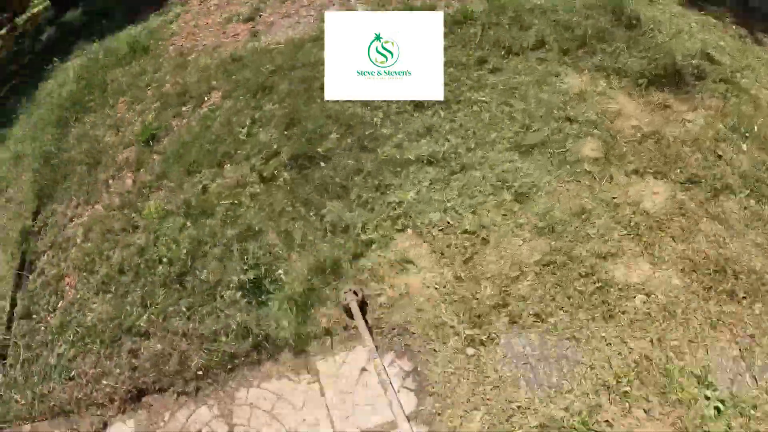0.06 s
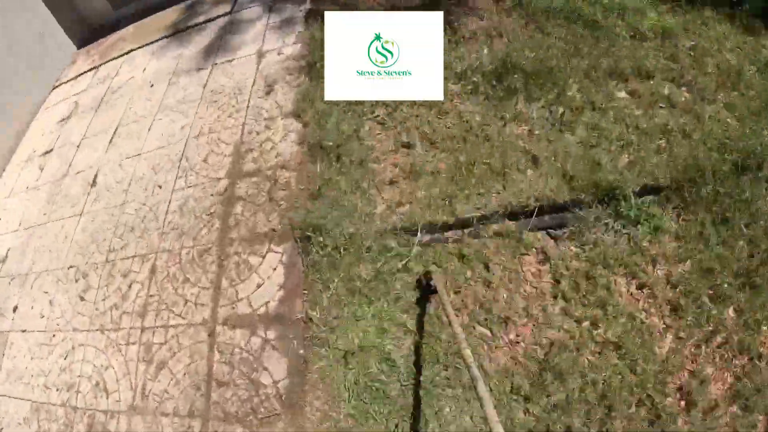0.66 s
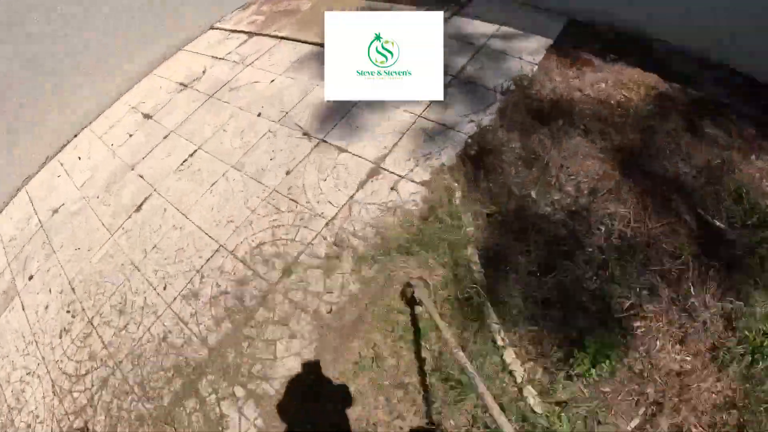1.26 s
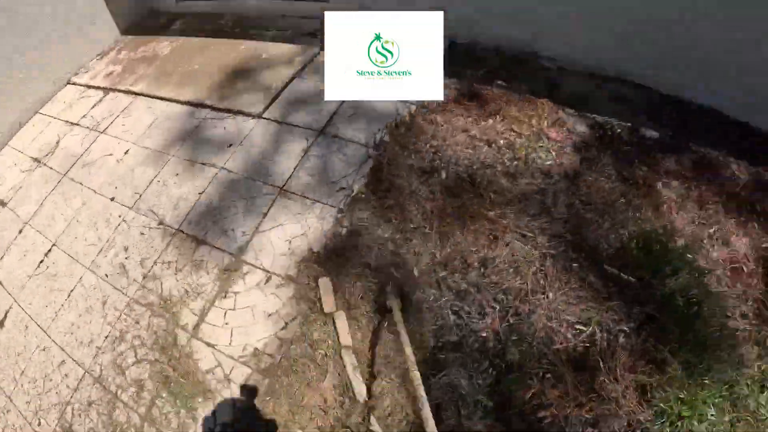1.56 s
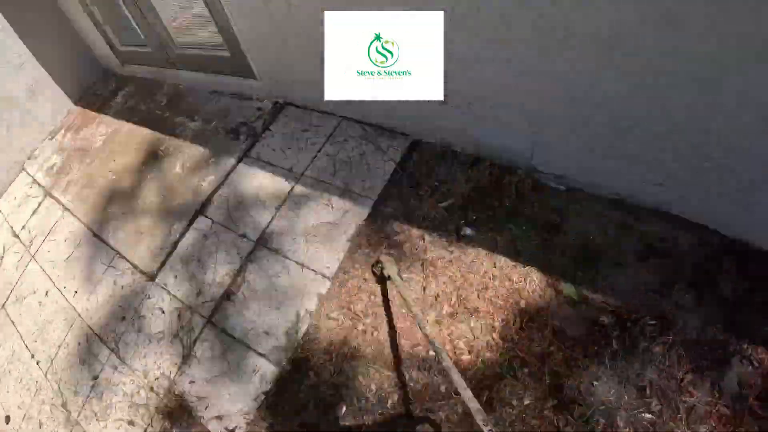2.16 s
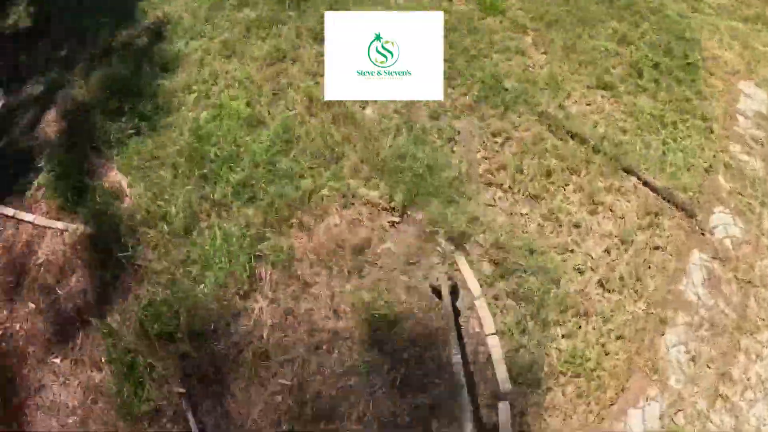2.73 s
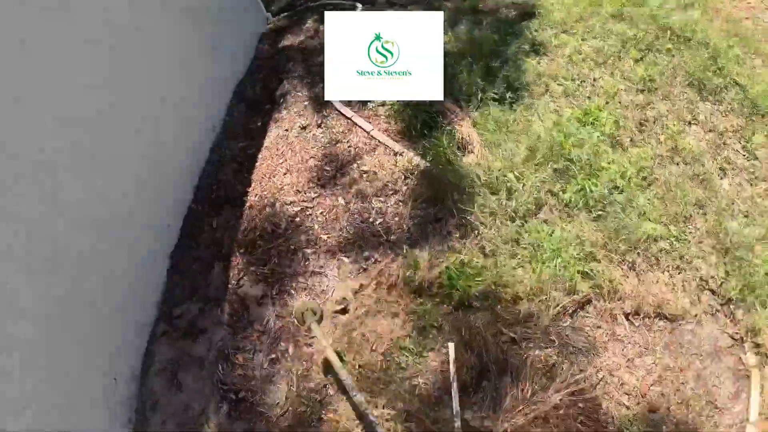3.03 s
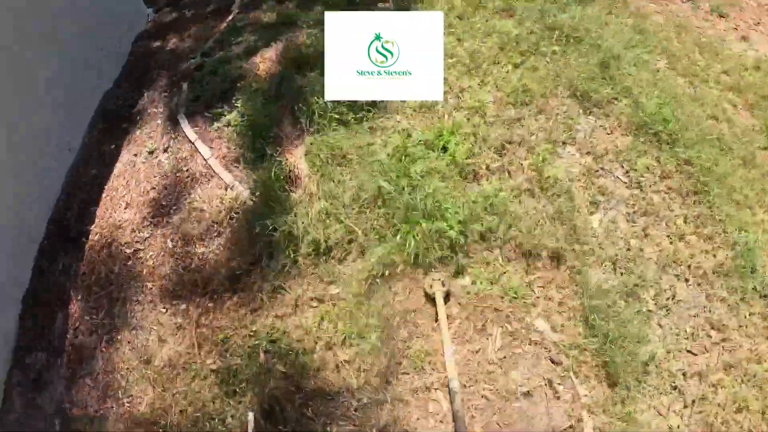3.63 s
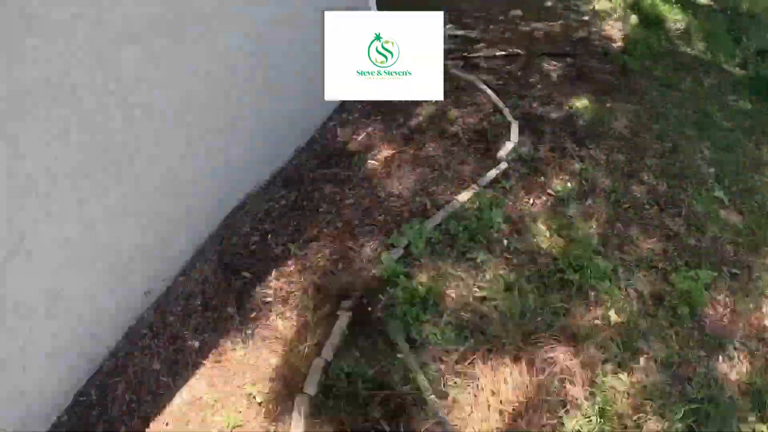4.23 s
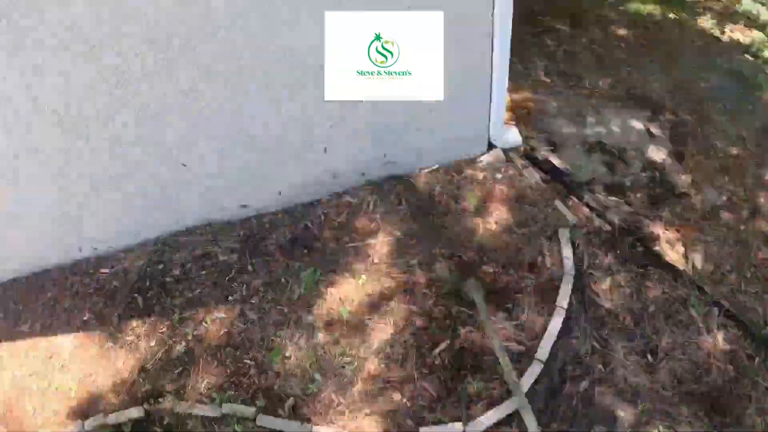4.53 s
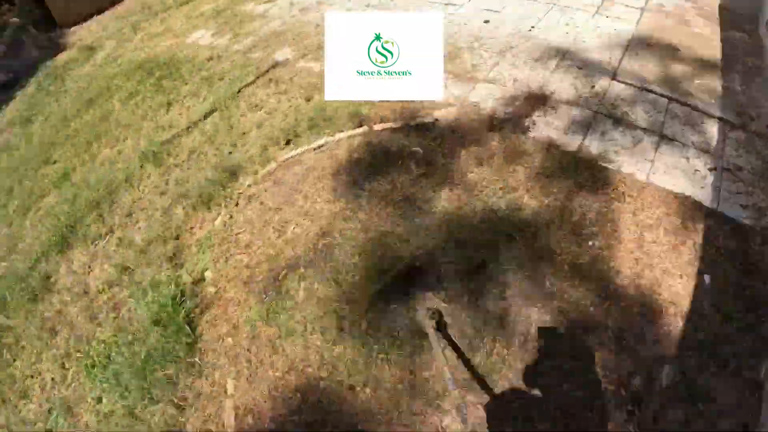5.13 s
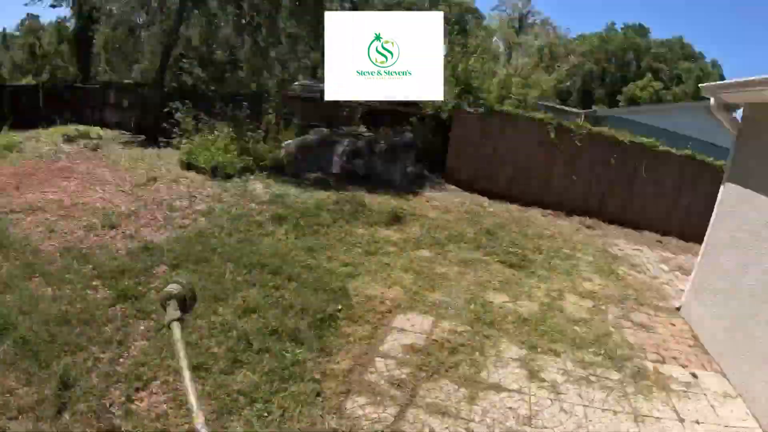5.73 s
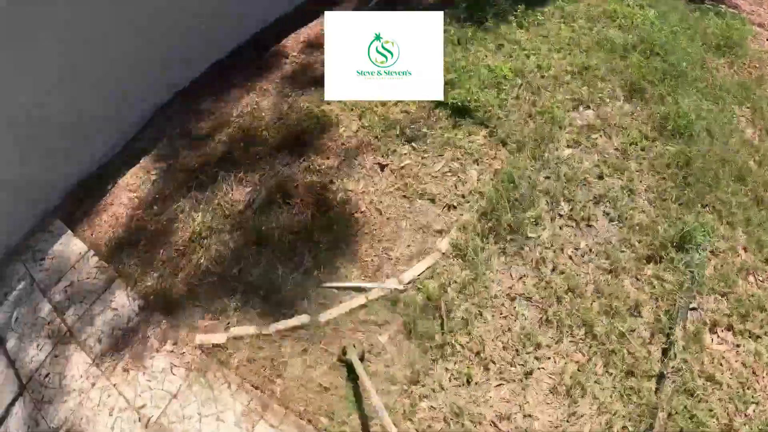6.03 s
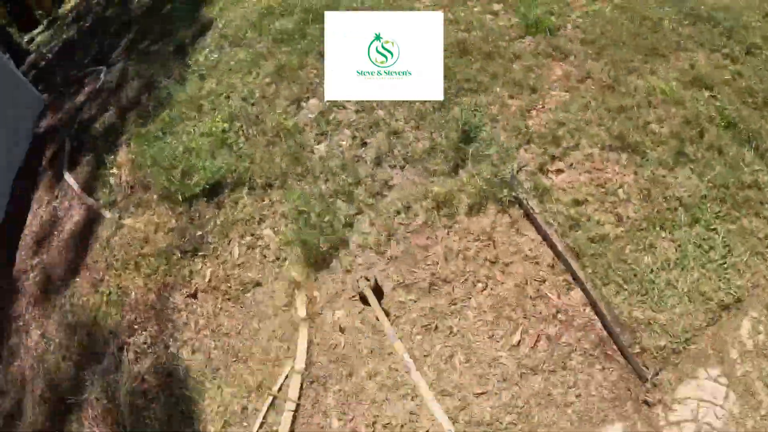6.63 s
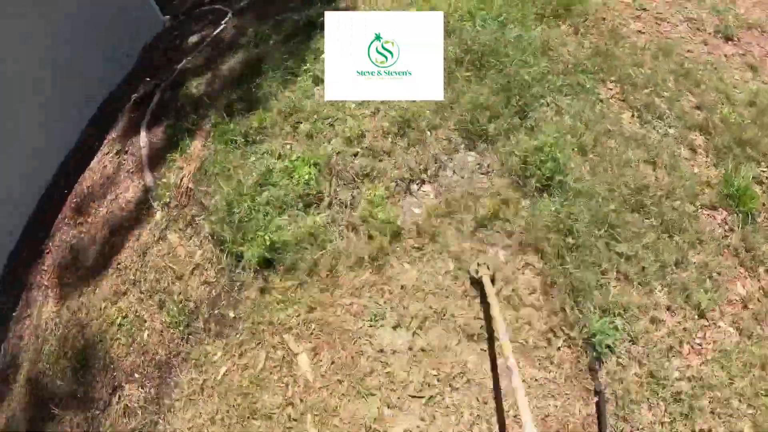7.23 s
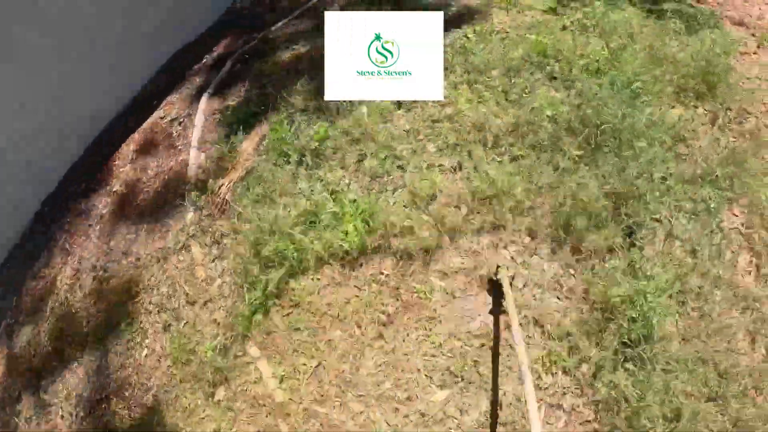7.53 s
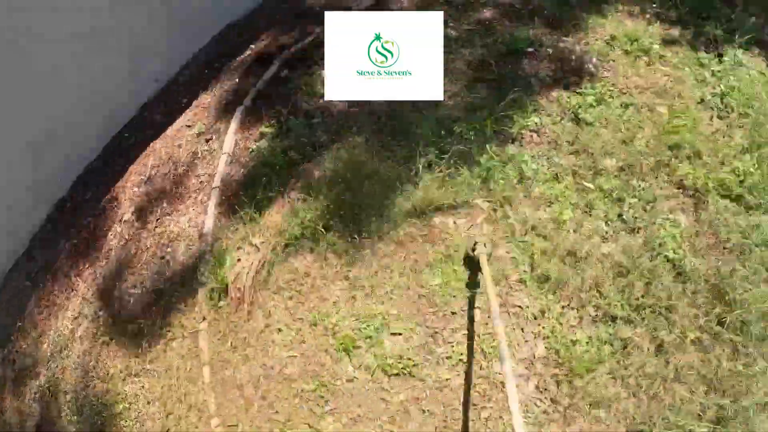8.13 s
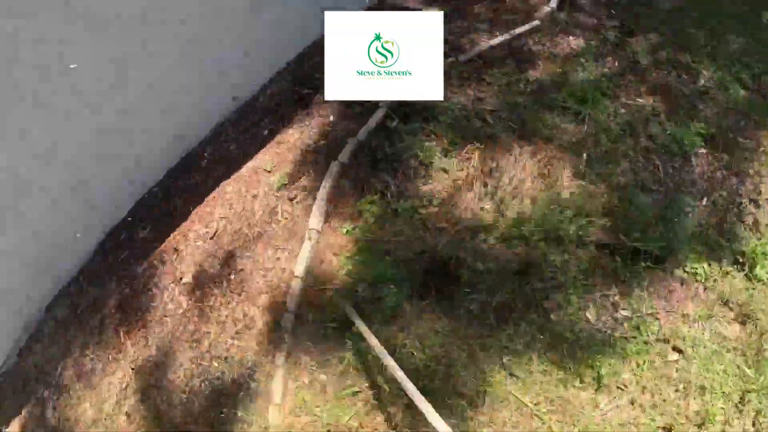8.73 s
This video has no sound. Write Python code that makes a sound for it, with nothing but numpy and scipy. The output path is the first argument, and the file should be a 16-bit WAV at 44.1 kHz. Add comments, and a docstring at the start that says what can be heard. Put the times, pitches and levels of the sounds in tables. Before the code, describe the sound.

A petrol string trimmer is already cutting grass at the start, heard close from the operator's chest in an open yard. Its fast buzz wavers constantly: several times a second the line bites into the grass with a burst of thrashing, the pitch sags, then it spins up again. Deep dips come right at the start, near 0.9 seconds and around 4.1 seconds. A rough whine and a bright hiss of flying clippings run alongside. At about 5.4 seconds the throttle is released and the head coasts with a lower, duller buzz. Near 5.9 seconds it revs sharply back up and keeps cutting until the end, just before 9 seconds. Wind hits the microphone in rumbling gusts and dull pops, notably around 1 second, from 3 to 5.5 seconds and from 7 to 8. A faint, distant engine drone slowly sinks in pitch and fades after 7 seconds.

```python
"""A buzz dips and rises as a string trimmer cuts a lawn, heard from the operator's chest.
The throttle sets the speed of the whirling line; each bite into the grass drags the buzz down with
a burst of thrashing, then it spins up again. The drive whines beside it and clippings hiss.
Near 5.5 s the throttle is let go once and the cutting head coasts.
A far drone sinks slowly in pitch, and air hits the microphone in rumbling gusts and dull pops."""
import sys
import numpy as np
from scipy import signal
from scipy.fft import rfft, irfft, next_fast_len
from scipy.io import wavfile
from scipy.ndimage import uniform_filter1d

SR = 44100
rng = np.random.default_rng(int(sys.argv[2]) if len(sys.argv) > 2 else 0)


def output_pcm(signal):
    """Save a mono or channel-first signal as 16-bit PCM at the path in sys.argv[1].

    Samples are clipped to [-1, 1] before scaling.
    """
    pcm = np.clip(np.atleast_2d(signal).T, -1, 1) * 32767
    wavfile.write(sys.argv[1], SR, np.round(pcm).astype(np.int16))


N = 387638
WORKING_HZ = 451  # passes of the line per second at normal cutting speed

# how alike a noise is on the left and right: f/Hz, likeness (1 = the same)
STEREO_LIKENESS = [(100, 0.79), (300, 1), (800, 1), (2500, 1), (4500, 0.99), (9000, 0.92), (14000, 0.9)]


def from_db(db):
    """Turn decibels into a gain."""
    return 10 ** (np.asarray(db) / 20)


def to_db(gain):
    """Turn a gain into decibels."""
    return 20 * np.log10(gain)


def rms_one(x):
    """Scale a signal so its average power is 1."""
    return x / np.sqrt(np.mean(x ** 2) + 1e-20)


def in_time(rows):
    """Join a table's timed points with straight lines, one curve per value column."""
    times, *columns = np.transpose(rows)
    return [np.interp(np.arange(N) / SR, times, column) for column in columns]


def at_hz(points, hz):
    """Look up a table by frequency, with octaves evenly spaced."""
    table_hz, values = np.transpose(points)
    return np.interp(np.log(hz), np.log(table_hz), values)


def drift(rate):
    """A smooth random wobble of typical size 1 that changes about rate times a second."""
    pole = np.exp(-40 * np.pi * rate / SR)
    slow = signal.lfilter([1], [1, -2 * pole, pole * pole], rng.standard_normal(N // 20 + 4002))[4000:]
    return np.interp(np.arange(N) / 20, np.arange(len(slow)), rms_one(slow))


def swell(peak_s, rise_s, fall_s, hold_s=0):
    """A rounded hump that reaches 1 at peak_s, holds and falls away."""
    t = np.arange(0, N, 20) / SR - peak_s
    shape = np.exp(-(np.minimum(t, 0) / rise_s) ** 2 - (np.maximum(t - hold_s, 0) / fall_s) ** 2)
    return np.interp(np.arange(N) / 20, np.arange(len(shape)), shape)


def turn(hz):
    """The phase: the angle turned so far at a changing frequency."""
    return 2 * np.pi * np.cumsum(hz) / SR


def sine(phase, level_db):
    """A pure tone whose average power is level_db."""
    return np.sqrt(2) * from_db(level_db) * np.cos(phase)


def white():
    """Two unrelated white noises."""
    return rng.standard_normal((2, N))


def coloured(noises, colour, likeness=STEREO_LIKENESS):
    """Give two noises one tone colour and blend them into left and right, at power 1."""
    size = next_fast_len(N + SR // 10)
    hz = np.maximum(np.fft.rfftfreq(size, 1 / SR), 1)
    mid, side = rfft(noises, size) * from_db(at_hz(colour, hz)) * hz / (hz + 10)
    alike = np.clip(at_hz(likeness, hz), 0, 1)
    left_right = np.sqrt(1 + alike) * mid + np.sqrt(1 - alike) * side * [[1], [-1]]
    return rms_one(irfft(left_right, size)[:, :N])


def throttle_shut(throttle, shut_hz=275, open_hz=376, catch_s=.07):
    """1 while the head coasts, 0 under power; the engine catches just after the throttle opens."""
    t = np.arange(N) / SR
    shut = np.clip((open_hz - throttle) / (open_hz - shut_hz), 0, 1)
    return np.maximum(shut, np.interp(t - catch_s, t, shut))


def grass_bites(brush_db=-47, recover_s=.016):
    """Each bite slows the head and tears grass; gives the speed lost (Hz) and the tearing level (dB)."""
    # bites into the grass: t/s when slowest, slowing time/s, speed lost/Hz, relative level/dB
    bites = [(0.025, 0.084, 206, -33), (0.186, 0.052, 55, -47), (0.284, 0.044, 38, -40),
             (0.628, 0.091, 53, -56), (0.721, 0.027, 68, -39), (0.837, 0.13, 80, -59),
             (0.896, 0.023, 8.8, -44), (0.941, 0.055, 175, -33), (1.151, 0.022, 39, -39),
             (1.264, 0.04, 84, -34), (1.449, 0.024, 41, -34), (1.571, 0.019, 15, -37),
             (1.803, 0.073, 31.5, -39), (1.927, 0.02, 81, -33), (2.105, 0.092, 74, -42),
             (2.306, 0.097, 86, -42), (2.416, 0.047, 28, -53), (2.672, 0.013, 32, -47),
             (2.729, 0.012, 25.6, -41), (2.78, 0.017, 24.2, -46), (2.85, 0.018, 25, -42),
             (2.93, 0.022, 20.6, -36.5), (3.064, 0.013, 37.4, -31), (3.193, 0.1, 85, -41),
             (3.225, 0.015, 15, -32), (3.413, 0.069, 86, -40), (3.545, 0.033, 43, -39),
             (3.766, 0.15, 86, -41), (3.963, 0.028, 63, -45), (4.022, 0.068, 29, -59),
             (4.127, 0.038, 141, -37), (4.257, 0.015, 31.6, -41), (4.353, 0.013, 45, -50),
             (4.459, 0.031, 114, -35), (4.52, 0.062, 47, -40), (4.665, 0.048, 68, -50),
             (4.735, 0.093, 94, -39), (4.96, 0.056, 84, -45), (5.073, 0.012, 24, -41),
             (5.127, 0.014, 30, -41), (5.233, 0.055, 84, -46), (5.313, 0.012, 39, -41),
             (5.385, 0.024, 10, -37), (5.471, 0.018, 9.2, -39), (5.922, 0.019, 170, -37),
             (6.003, 0.012, 52, -28), (6.095, 0.046, 85, -43), (6.226, 0.036, 127, -45),
             (6.341, 0.018, 65, -48), (6.398, 0.022, 75, -41), (6.455, 0.036, 69, -40),
             (6.764, 0.032, 108, -40), (7.006, 0.044, 42, -43), (7.115, 0.016, 26.5, -35),
             (7.412, 0.047, 61, -43), (7.499, 0.037, 45, -38), (7.645, 0.052, 72, -47),
             (7.741, 0.05, 82, -38), (7.848, 0.047, 68, -56.5), (7.952, 0.029, 97, -36),
             (8.072, 0.03, 105, -40), (8.134, 0.025, 96, -40), (8.316, 0.048, 96, -38),
             (8.434, 0.04, 102, -51), (8.528, 0.048, 44, -47), (8.755, 0.083, 77, -41)]
    sag_hz = 0
    power = from_db(brush_db + 5 * np.tanh(drift(8.3))) ** 2  # light brushing between bites
    for t, slowing_s, lost_hz, db in bites:
        sag_hz += lost_hz * swell(t, slowing_s, recover_s + .4 * slowing_s)
        tearing = swell(t - .57 * slowing_s, slowing_s, slowing_s)  # peaks while the head still slows
        power += (from_db(db) * tearing) ** 2
    return sag_hz, to_db(np.sqrt(power))


def line_buzz(speed, phase, shut, load, coast_hz=234, ring_hz=2450, edge_hz=2950, flutter_db=3):
    """Each pass of the line makes a pulse of air, built from harmonics: tones at multiples of its speed."""
    # harmonics 1, 2, 3 and those above, as the head is swung about: t/s, relative level/dB
    first = [(0, -42), (0.15, -39), (1.8, -44), (2.0, -48.0), (2.1, -36.0), (3.74, -42), (3.99, -49),
             (4.04, -56), (4.14, -40), (4.44, -43), (4.84, -34.0), (7.08, -38), (8.79, -35.5)]
    second = [(0, -34.5), (0.5, -35.5), (0.65, -44.5), (0.95, -33.5), (1.45, -43.5), (2.05, -31),
              (2.24, -46), (2.44, -33.0), (3.54, -39.5), (4.24, -33), (4.59, -37.5), (6.34, -34),
              (6.44, -46.5), (6.54, -31.5), (6.98, -33.5), (7.23, -50), (7.28, -35.5), (8.79, -36.5)]
    third = [(0, -41.5), (2.1, -36.0), (2.9, -41.5), (3.3, -37.5), (4.7, -37.5), (4.82, -31.5), (5.2, -35),
             (6.4, -35.5), (7.6, -38.5), (8.79, -36.0)]
    upper = [(0, -40), (1.1, -39.5), (1.7, -36.5), (2.5, -38), (2.9, -41.0), (3.3, -39.5), (4.6, -41.0),
             (4.85, -37.5), (5.13, -42), (5.27, -39), (6.6, -37), (7.7, -40.5), (8.2, -36.5), (8.79, -38.5)]
    # shape of the pulse: harmonic number, level/dB added to upper
    pulse_shape = [(4, -2.5), (5, -1), (6, -1), (7, -14.5), (8, -1.5), (9, 0), (10, -12.5), (11, 0),
                   (12, -3), (13, -17), (14, -4), (16, -2), (18, -9), (23, -12.5), (34, -12)]
    # thin overtones above harmonic 6: t/s, added level/dB
    overtones = [(0, -0.5), (.7, -3.5), (1.3, 0), (2.2, -1), (3, -4), (5.2, -3.5), (6, -1), (7.5, -2),
                 (8.1, -0.5), (8.79, -1.5)]
    # duller buzz and thin whistle of the coasting head: f/Hz, level/dB at the speed coast_hz
    coast_colour = [(230, -52), (470, -43.5), (700, -41), (950, -48.5), (1150, -43.5), (1380, -37),
                    (1650, -40), (1850, -50), (2150, -43), (2500, -59.5), (3450, -50), (3720, -45.5),
                    (4000, -55.5), (8000, -64)]

    speed_db = to_db(speed / WORKING_HZ)  # a faster line is louder
    low_db = [in_time(curve)[0] + rise * speed_db
              for curve, rise in ((first, 1.7), (second, 2.47), (third, 1))]
    upper_db = in_time(upper)[0] + speed_db
    overtone_db, = in_time(overtones)
    coast_db = 1.4 * to_db(speed / coast_hz)
    # grass or slack coasting shakes the line, which roughens the high harmonics most
    shaken = phase + (.051 * load + .045 * shut) * drift(50)
    throb_db = 1.14 * drift(16.5)
    buzz = 0
    for k in range(1, int(pulse_shape[-1][0]) + 1):
        hz = k * speed
        level_db = low_db[k - 1] if k <= 3 else upper_db + np.interp(k, *np.transpose(pulse_shape))
        level_db = level_db + overtone_db * (k > 6)
        # the sound given off peaks near ring_hz and drops above edge_hz
        level_db += 3.5 / (1 + ((hz - ring_hz) / 380) ** 2)
        level_db -= 7 * (1 + np.tanh((hz - edge_hz) / 180)) / 2
        level_db = (1 - shut) * level_db + shut * (at_hz(coast_colour, hz) + coast_db)
        level_db += throb_db + flutter_db * np.tanh(drift(17.3))
        spread = .22 * k * k  # the tip sweeps past rather than snaps, which stretches each pulse
        buzz += sine(k * shaken + spread, level_db)
    return buzz


def drive_whine(speed, phase, working_db=-42, cycles_per_pass=20 / 7, flutter_db=7):
    """The drive turns faster than the head; its rough whine beats with the line's third harmonic."""
    # tones of the whine: harmonic number, relative level/dB
    harmonics = [(1, 0), (2, -8.5), (3, -40), (4, -32)]
    level_db = working_db + 2.3 * to_db(speed / WORKING_HZ)
    spin = cycles_per_pass * phase + .83 * drift(25)
    return sum(sine(k * spin, level_db + db + flutter_db * np.tanh(drift(33))) for k, db in harmonics)


def grass_thrash(phase, bite_db, lumpy_db=4.5, gain_db=1):
    """Stalks are torn in uneven bursts, once on each pass."""
    # tone colour of tearing grass: f/Hz, relative level/dB
    colour = [(200, -18.5), (450, -2.5), (700, -1), (1100, 6), (1700, 1), (2500, -3), (3300, -1.5),
              (6000, -59), (16000, -40)]
    bursts = (1 + .51 * np.cos(phase)) * from_db(lumpy_db * np.tanh(drift(49)))
    return from_db(bite_db + gain_db) * coloured(white() * bursts, colour)


def clipping_spray(throttle, phase, load, base_db=-35.5, ticks_per_s=900):
    """Rushing air and ticks of flying clippings grow with the throttle and with each bite."""
    # tone colour of the bright hiss: f/Hz, relative level/dB
    colour = [(300, -11.5), (1500, -9), (3200, -2.5), (4200, 2.5), (5200, 1), (6200, -0.5), (7200, 1.5),
              (9500, 0), (12500, -1), (16000, -4.5)]
    level_db = base_db + .57 * to_db(throttle / WORKING_HZ) + .068 * to_db(load) + .92 * drift(4.1)
    ticks = (rng.random(N) < ticks_per_s / SR) * white() * 1.7
    rush = white() * (1 + .31 * np.cos(phase))
    flicker = from_db(1.46 * drift(37))
    return from_db(level_db) * coloured((rush + ticks) * flicker, colour)


def far_drone_and_air(air_db=-50, waver_db=3.5):
    """A far engine, perhaps a passing plane, drones over steady outdoor air."""
    # the sinking drone: t/s, f/Hz, level/dB
    drone_path = [(0, 252.3, -64.5), (1.8, 242, -67.5), (2.2, 242.9, -55), (3, 236.1, -60.5),
                  (3.6, 230.9, -54.5), (4.4, 216, -65), (5.1, 202.9, -54.5), (5.9, 188.2, -53),
                  (6.5, 179, -57), (7.2, 175.9, -66), (8.8, 169.2, -84)]
    # tone colour of the air: f/Hz, relative level/dB
    colour = [(30, -14), (150, -5.5), (400, -10.5), (560, -4), (680, 7), (850, -28), (2000, 1), (8000, -43)]
    hz, level_db = in_time(drone_path)
    phase = turn(hz)
    drone = sine(phase, level_db + waver_db * drift(5.9))
    drone += sine(3 * phase, level_db - 3 + waver_db * drift(2.2))
    return drone + from_db(air_db) * coloured(white(), colour)


def wind(calm_db=-54, lumpy_db=7, gust_gain_db=-1.5, edge_s=.021):
    """Gusts hit the microphone's openings and make a lumpy rumble."""
    # gusts: t/s at the start, length/s, relative level/dB
    gusts = [(0.055, 0.077, -42), (0.774, 0.032, -40.5), (0.901, 0.09, -40), (1.075, 0.095, -39.5),
             (1.25, 0.12, -46.5), (1.45, 0.14, -49), (1.695, 0.044, -55), (2.7, 0.13, -44),
             (3.23, 0.21, -49), (3.484, 0.086, -43), (3.646, 0.29, -39), (4.17, 0.2, -44.5),
             (4.581, 0.042, -50.5), (4.911, 0.033, -48), (5.11, 0.11, -44), (5.311, 0.036, -47),
             (5.438, 0.24, -43), (7.04, 0.25, -46.5), (7.37, 0.12, -47.5), (7.77, 0.25, -43)]
    # tone colour of the rumble: f/Hz, relative level/dB
    colour = [(25, -11), (60, -3.5), (110, -2), (200, -1.5), (350, -0.5), (700, -3.5), (2000, -28)]
    # how alike left and right are: f/Hz, likeness (1 = the same)
    likeness = [(30, 0.93), (300, 0.92)]
    gusting = sum(from_db(db + gust_gain_db) * swell(t, edge_s, edge_s, length)
                  for t, length, db in gusts)
    rumble = coloured(white() * from_db(lumpy_db * np.tanh(drift(28))), colour, likeness)
    return rumble * (from_db(calm_db) + gusting) * from_db([[-1.7], [1.7]])  # stronger on the right


def wind_pops(fade_s=.017, band_hz=(170, 1300), gain_db=-5):
    """Puffs of air hit the microphone; each is a short, dull pop."""
    # pops: t/s, relative peak level/dB
    pops = [(0.784, -22), (1.084, -25), (1.117, -23), (1.126, -16.5), (1.131, -18), (1.554, -23),
            (2.168, -37), (2.384, -35), (2.721, -21), (3.11, -23), (4.299, -33), (4.339, -28), (5.176, -28),
            (5.313, -20), (5.448, -21), (7.246, -19), (7.466, -27), (7.517, -20), (7.824, -30),
            (7.916, -15.5)]
    t, puffs = np.arange(N) / SR, np.zeros(N)
    for pop_s, db in pops:
        puffs[np.searchsorted(t, pop_s)] = from_db(db + gain_db)
    fading = signal.lfilter([1], [1, -from_db(-60 / (fade_s * SR))], puffs + 1e-18)  # 60 dB per fade_s
    band = signal.butter(2, band_hz, "band", fs=SR, output="sos")
    return fading * rms_one(signal.sosfilt(band, rng.standard_normal(N)))


def scene(usual_bite_db=-42, coasting_spray_db=-5, surge_db=3.5, surge_hz_per_s=5800):
    """Mix the sounds; the head's speed is the throttle less the drag of the grass, with small snags."""
    # throttle, as passes of the line per second when it cuts nothing: t/s, f/Hz
    free_speed = [(0.0, 527), (0.36, 519), (1.08, 492), (1.4, 448), (2.6, 459), (3.04, 428), (3.09, 508),
                  (3.6, 495), (4.4, 440), (5.28, 465), (5.34, 444), (5.42, 298), (5.55, 243), (5.84, 228),
                  (5.88, 415), (5.97, 493), (6.6, 464), (8.2, 512), (8.79, 507)]
    throttle, = in_time(free_speed)
    shut = throttle_shut(throttle)
    sag_hz, bite_db = grass_bites()
    snags = 1 + .013 * (1 - shut) * drift(22)
    speed = (throttle - sag_hz) * snags
    phase = turn(speed)
    load = from_db(bite_db - usual_bite_db)  # 1 for a usual bite
    # the buzz swells while the head spins up and ducks while it slows
    acceleration = uniform_filter1d(np.gradient(throttle - sag_hz) * SR, size=1200)
    surge = from_db(surge_db * np.tanh(acceleration / surge_hz_per_s))
    tones = surge * line_buzz(speed, phase, shut, load) + drive_whine(speed, phase)
    hiss = from_db(coasting_spray_db * shut) * clipping_spray(throttle, phase, load)
    return tones + grass_thrash(phase, bite_db) + hiss + wind_pops() + wind() + far_drone_and_air()


def record(dry, cutoff_hz=16000):
    """Cut away the very highest treble."""
    return signal.sosfilt(signal.ellip(12, .1, 90, cutoff_hz, fs=SR, output="sos"), dry)


dry = scene()
out = record(dry)
output_pcm(out)
```